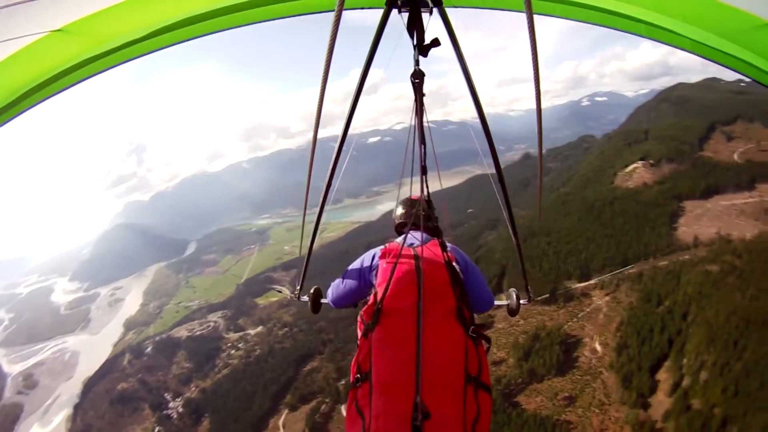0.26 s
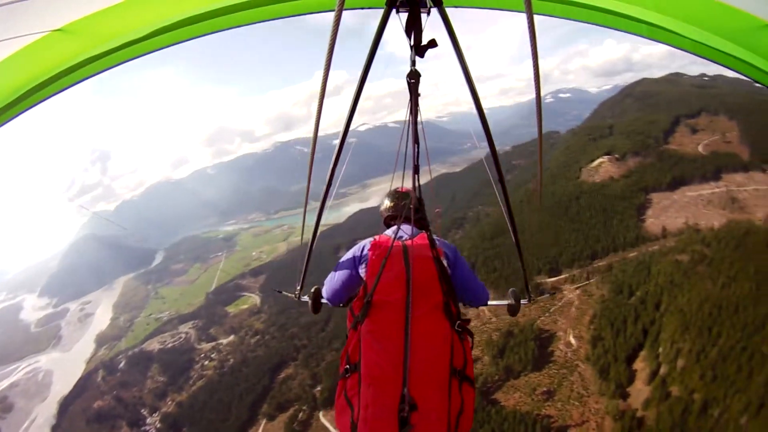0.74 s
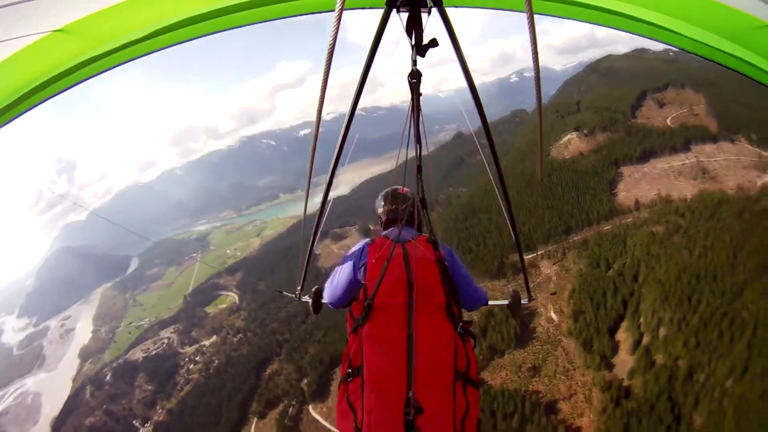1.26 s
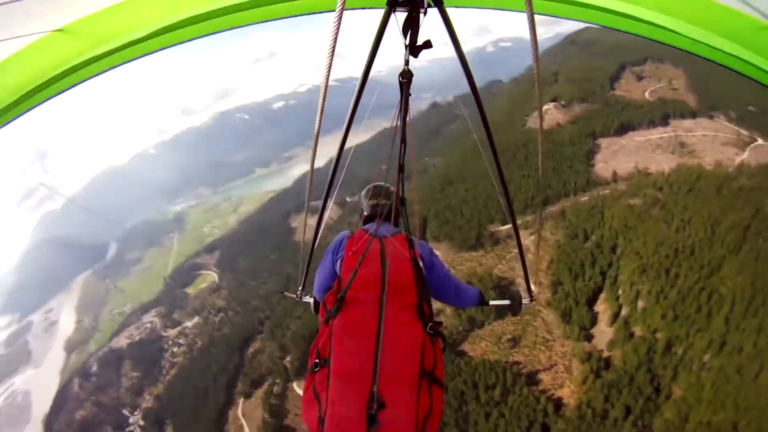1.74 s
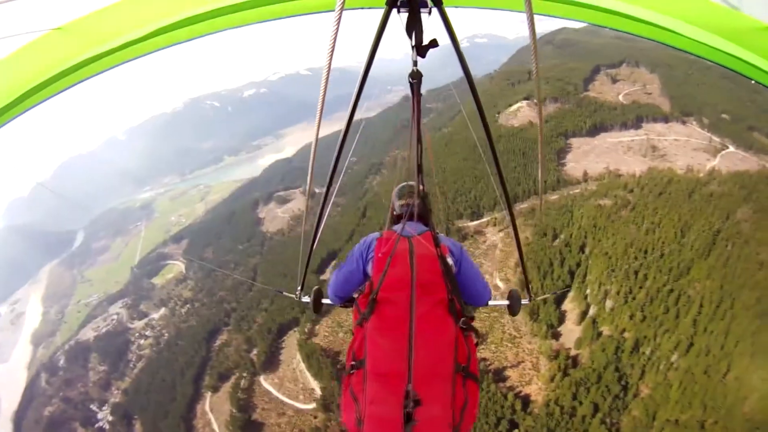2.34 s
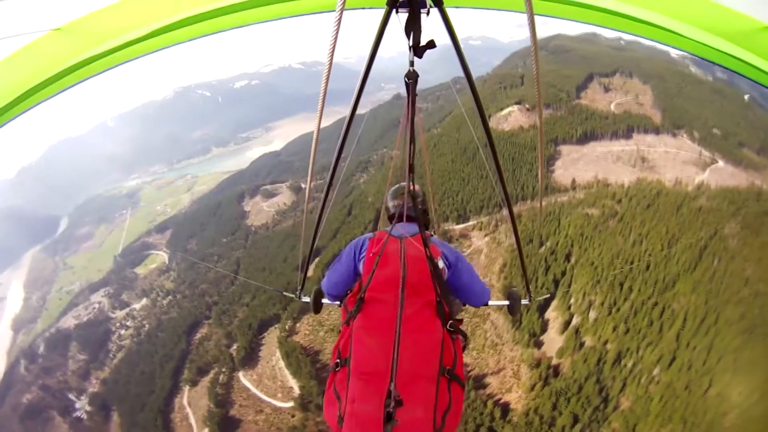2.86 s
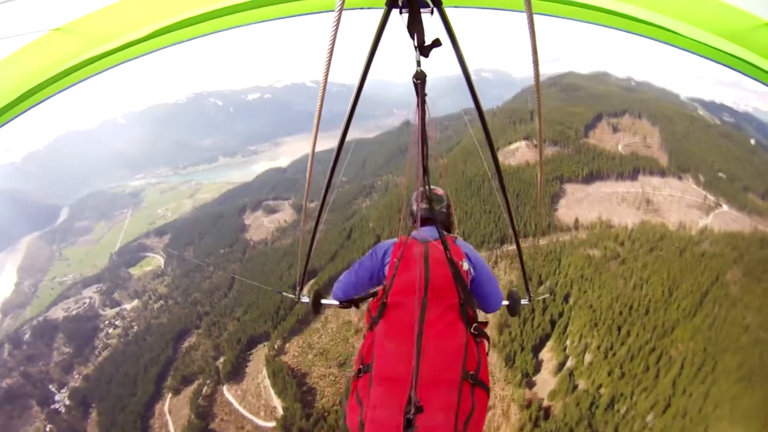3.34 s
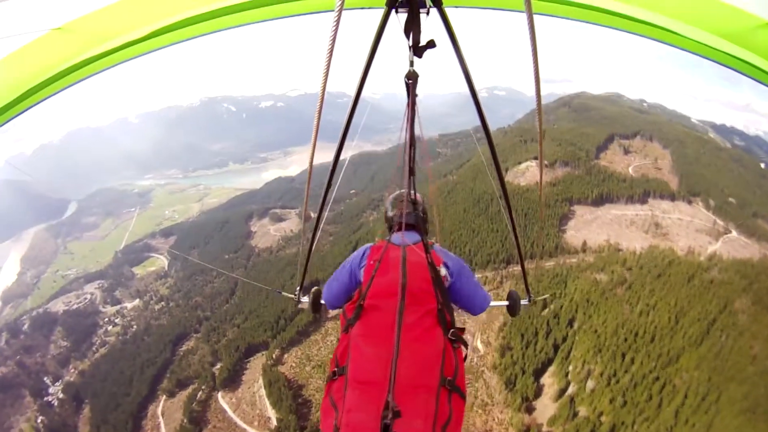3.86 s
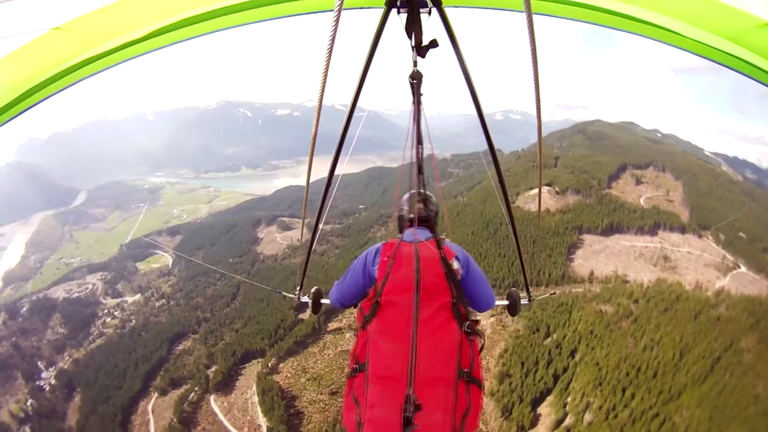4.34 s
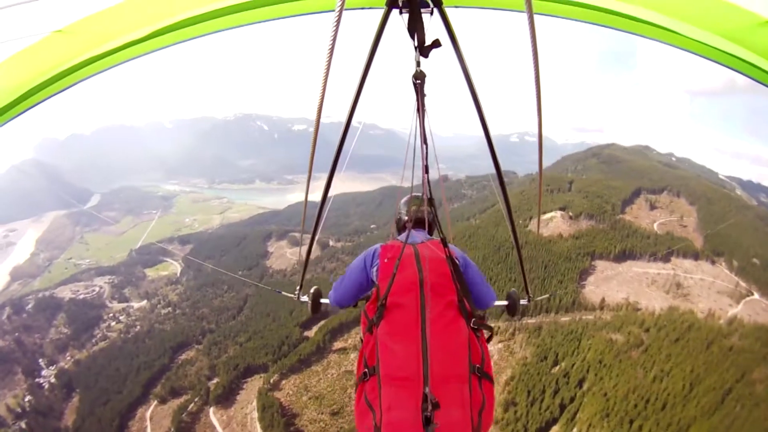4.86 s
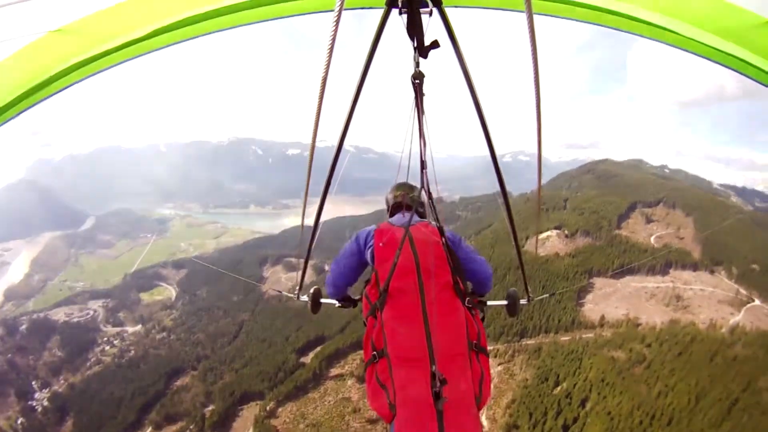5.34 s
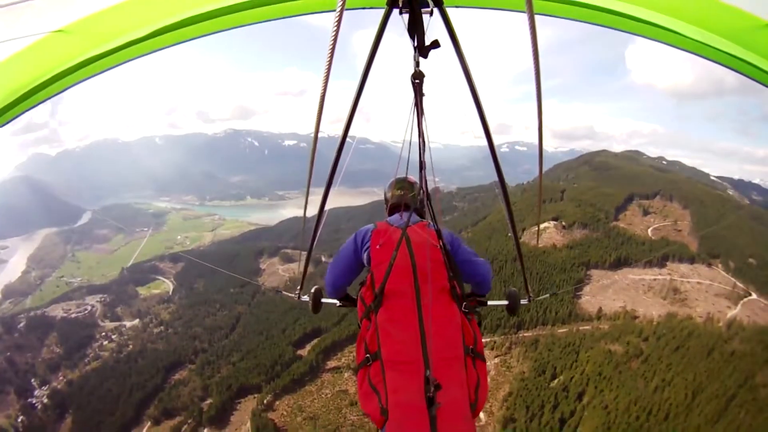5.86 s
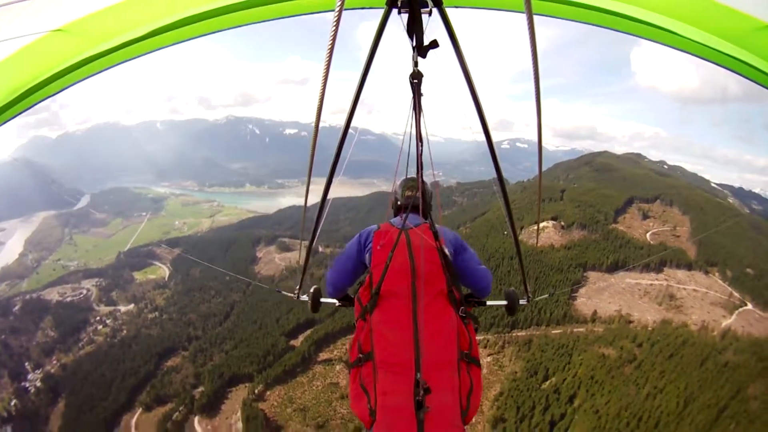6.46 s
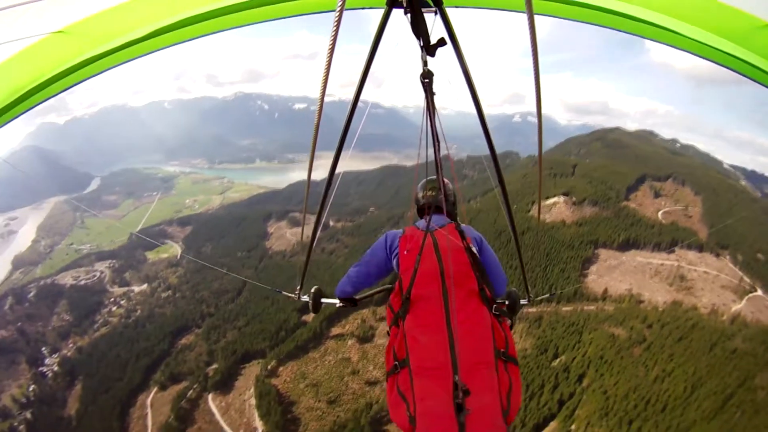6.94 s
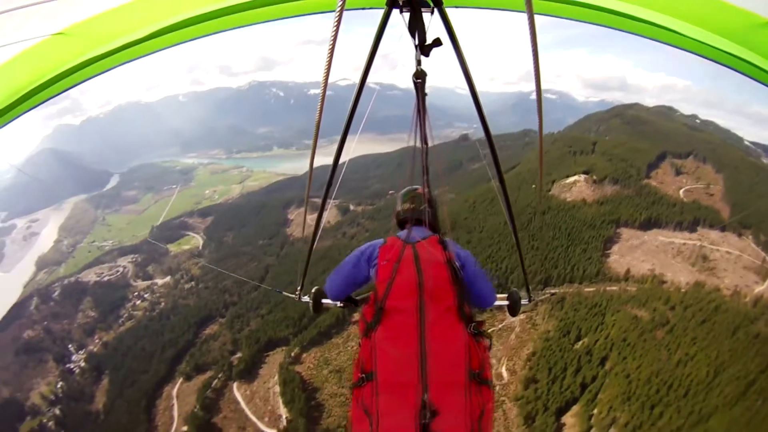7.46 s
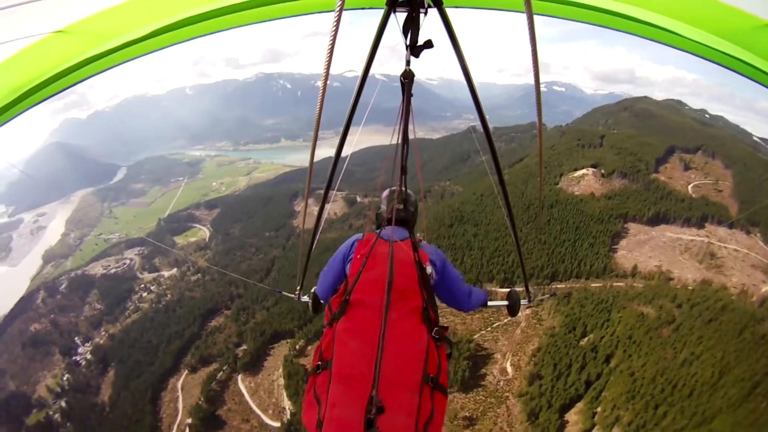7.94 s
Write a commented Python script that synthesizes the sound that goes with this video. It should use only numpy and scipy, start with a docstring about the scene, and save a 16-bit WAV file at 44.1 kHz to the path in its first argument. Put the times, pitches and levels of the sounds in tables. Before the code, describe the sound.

A hang glider in flight, heard through a small closed housing fixed to its frame, very close and without any echo. A brief stronger gust opens the sound, then deep, bass-heavy rumble continues with uneven surges and a low frame thrum. Over it, air sputters across the microphone port in hollow, breathy puffs lasting milliseconds, while a smoother soft rush passes over the sail. From 0.3 to 2 seconds the flow is moderate, with a dull jolt near 1.7. Faint dry ticks of a loose fitting gather around 2.6 to 3.1. The wind strengthens after 3 seconds, spitting hard and brightly at about 4.1 to 4.4, with more bursts and a clearer tick until 4.8. After 5 seconds it eases; soft thumps come near 5.8, 6.1, 6.2, 6.8 and 7.1. The last second is quieter, mostly rumble and gentle airflow, with a small knock near 8.1.

```python
"""Wind buffets the closed housing of a small camera on the keel of a hang glider: rumble and a frame mode,
made of low noise in three ranges. Small eddies spit across the microphone port and ring its cavity in short
puffs, made of noise with fast changes of level. A loose fitting ticks now and then, made of ringing sines.
Air rushes more smoothly over the sail, made of gently wavering noise, and the preamplifier hisses faintly."""
import sys
import numpy as np
from scipy import signal
from scipy.fft import rfft, irfft, next_fast_len
from scipy.io import wavfile
from scipy.ndimage import uniform_filter1d

SR = 44100
rng = np.random.default_rng(int(sys.argv[2]) if len(sys.argv) > 2 else 0)


def to_wav(sig):
    """Store sig (one row per channel, or 1-D mono) as 16-bit WAV at the path in sys.argv[1].

    Samples outside -1..1 are clipped; the rate is SR.
    """
    pcm = np.clip(np.atleast_2d(sig), -1, 1) * 32767
    pcm = np.round(pcm).astype(np.int16)
    wavfile.write(sys.argv[1], SR, pcm.T)  # frames by channels


def ratio(d):
    """dB to gain"""
    e = np.asarray(d, float) / 20
    return 10 ** e


N = 361619   # length of the scene in samples

# flow of air across the port, heard as the cavity rush: (time [s], level [dB])
PORT_FLOW = [(0.0, -45.5), (0.02, -35.5), (0.04, -45), (0.09, -41.5), (0.27, -49), (0.3, -42),
             (0.39, -43.5), (0.43, -50), (0.8, -47.5), (0.96, -51), (1.0, -48), (1.23, -41), (1.34, -48),
             (1.41, -42), (1.69, -48.5), (2.17, -41.5), (2.31, -40.5), (2.4, -40.5), (2.53, -44),
             (3.15, -40.5), (3.31, -33.5), (3.33, -38), (3.52, -35), (3.56, -39.5), (3.95, -39),
             (3.97, -47.5), (4.13, -31.5), (4.22, -34), (4.25, -33.5), (4.27, -32.5), (4.39, -33),
             (4.43, -33), (4.52, -44.5), (4.59, -38.5), (4.68, -37), (4.73, -45), (4.77, -45), (4.8, -41),
             (4.93, -47.5), (4.96, -55), (5.02, -46.5), (5.14, -52.5), (5.37, -49), (5.98, -49.5),
             (6.03, -53.5), (6.05, -41.5), (6.07, -49), (6.65, -52), (6.74, -46), (6.76, -52.5),
             (6.94, -50.5), (6.96, -47), (7.17, -55.5), (8.2, -57)]
PUFF_CREST_DB = 8.5   # peak of a burst of noise over its rms


def rms_one(x):
    """Scale to rms 1."""
    return x / np.sqrt(np.mean(x ** 2) + 1e-20)


def in_time(rows):
    """Draw straight lines between the rows of a table, giving each column at every sample."""
    s, *columns = np.transpose(rows)
    return [np.interp(np.arange(N) / SR, s, column) for column in columns]


def bells(rows):
    """Add up level changes (dB) that each swell and fade as a bell; the length is its standard deviation."""
    t = np.arange(N) / SR
    total_db = 0
    for s, change_db, length_ms in rows:
        total_db = total_db + change_db * np.exp(-.5 * ((t - s) / (length_ms / 1000)) ** 2)
    return total_db


def coloured(x, colour, low_hz=0, high_hz=np.inf):
    """Impose a spectrum, keeping one part of it between soft edges."""
    size = next_fast_len(N + 8192)
    hz = np.fft.rfftfreq(size, 1 / SR) + 1e-3   # never zero, for the logarithm
    colour_hz, colour_db = np.transpose(colour)
    gain = ratio(np.interp(np.log(hz), np.log(colour_hz), colour_db))
    gain *= np.sqrt(1 / (1 + (low_hz / hz) ** 8) / (1 + (hz / high_hz) ** 8))
    return irfft(rfft(x, size) * gain, size)[:N]


def drift(rate_hz):
    """Slow chance of spread 1: noise twice through a one-pole low-pass."""
    r = np.exp(-20 * np.pi * rate_hz / SR)   # worked out at every tenth sample
    noise = rng.standard_normal(N // 10 + 4002)
    slow = signal.lfilter([1], [1, -2 * r, r * r], noise)[4000:]   # skip the filter's start
    return np.interp(np.arange(N) / 10, np.arange(len(slow)), rms_one(slow))


def ring(clicks, hz, t60):
    """A unit click sets a sine of height 1 ringing, which falls by 60 dB in t60 seconds."""
    r = ratio(-60 / (max(t60, .002) * SR))
    w = 2 * np.pi * hz / SR
    return signal.lfilter([0, np.sin(w)], [1, -2 * r * np.cos(w), r * r], clicks + 1e-18)


def buffeting():
    """Low pressure noise: big eddies push evenly, the smallest in lumps; all surge a few times a second."""
    # buffeting before the jolts: (time [s], deep rumble [dB], frame thrum [dB], upper rumble [dB])
    buffet = [(0.0, -30, -56, -65), (0.04, -32, -46, -48), (0.11, -35.5, -45, -47.5),
              (1.05, -36.5, -44.5, -52), (1.48, -33, -46.5, -52), (1.53, -39.5, -46, -53),
              (1.71, -37.5, -44, -54.5), (2.47, -38, -39.5, -53.5), (2.69, -34, -42, -47.5),
              (3.08, -35, -36.5, -51), (3.31, -29, -47, -45.5), (3.38, -26.5, -33, -48),
              (3.45, -33.5, -47, -47), (3.54, -26.5, -47, -45), (3.59, -43, -34.5, -51),
              (3.9, -34, -44.5, -49.5), (4.22, -34.5, -37.5, -49.5), (4.27, -29, -30.5, -47),
              (4.41, -33, -44, -47), (4.54, -31, -39.5, -42), (4.91, -34, -42, -46),
              (5.71, -36, -37.5, -47), (5.98, -37, -45.5, -55), (6.05, -52, -41, -49),
              (6.12, -39, -45, -53.5), (7.42, -36.5, -43, -49.5), (8.06, -40, -43.5, -52.5),
              (8.2, -41, -44, -51.5)]
    # jolts of the frame, in full on the upper rumble: (time [s], level change [dB], length [ms])
    jolts = [(1.7, 13, 51), (2.05, 5.5, 35), (2.7, 5.5, 78), (3.45, -1, 53), (4.09, 11, 13), (4.69, 6, 21),
             (5.09, 2, 34), (5.4, 0, 37), (5.77, 6.5, 23), (6.07, 14, 23), (6.21, 15, 15), (6.83, 11, 15),
             (7.12, 10, 25), (8.1, 8.5, 49)]
    # colour of the rumble: (frequency [Hz], level per Hz [dB])
    rumble_colour = [(4, -5.5), (8, -10), (15, 1.5), (30, 0.5), (40, -1.5), (50, -8), (68, -8), (81, -2.5),
                     (100, -15), (140, -17.5), (250, -27), (400, -29.5), (700, -43.5)]
    # (low edge [Hz], high edge [Hz], evenness 0-1, lumpiness [dB], surge [dB])
    ranges = [(0, 53.7, 1.0, .1, 2.4), (58, 103.0, 0.89, .1, 2.2), (113, 490, .1, 1.4, 1.9)]
    thrum_jolt_share = 0.36
    deep_db, thrum_db, upper_db = in_time(buffet)
    jolt_db = bells(jolts)
    levels_db = [deep_db, thrum_db + thrum_jolt_share * jolt_db, upper_db + jolt_db]
    out = np.zeros(N)
    for level_db, (low_hz, high_hz, evenness, lumpy_db, surge_db) in zip(levels_db, ranges):
        noise = rng.standard_normal(N) * ratio(lumpy_db * drift(18))
        push = rms_one(coloured(noise, rumble_colour, low_hz, high_hz))
        # dividing by the noise's own smoothed power evens out its swells
        swell = uniform_filter1d(uniform_filter1d(push ** 2, size=1800), size=1800)
        even = push / (swell + 0.054) ** (evenness / 2)
        out += ratio(level_db) * rms_one(even * ratio(surge_db * drift(7.5)))
    return out


def spitting():
    """Eddies shed unevenly some tens of times a second (dB); a strong flow runs smoother than a weak one."""
    reference_flow_db = -43.5
    flow_db, = in_time(PORT_FLOW)
    shedding = rms_one(drift(160) + 0.81 * drift(60))
    lulls_db = 0.89 * drift(9.7)
    # take out most of the slow part
    shedding = rms_one(shedding - 0.81 * uniform_filter1d(shedding, size=1600))
    swing_db = np.clip(3.5 - 0.14 * (flow_db - reference_flow_db), 1, 9)
    return shedding * swing_db + 1.34 * drift(370) + lulls_db


def lesser_eddies():
    """Smaller bursts at random moments, their strength following the flow; rows as in the table of puffs."""
    gap, size, bright, length = rng.standard_normal((200, 4)).T
    s = np.cumsum(np.exp(.8 * gap) / 9.0)   # median gap 1/9 s
    flow_db = np.interp(s, *np.transpose(PORT_FLOW))
    rms_db = flow_db + 4.0 + 3 * np.tanh(size)   # at most 3 dB to either side
    bright_db = 6 * np.tanh(bright)
    length_ms = 2.35 * np.exp(0.58 * length)   # median 2.35 ms
    rows = np.transpose([s, rms_db + PUFF_CREST_DB, bright_db, length_ms])
    return list(rows[s < N / SR])


def puff_envelopes():
    """Each burst swells and dies within milliseconds: one envelope below the cavity top, one above."""
    # the strongest eddies bursting at the port:
    # (time [s], approximate peak [dB], level above the cavity top against below [dB], time to the peak [ms])
    puffs = [(0.0291, -21.5, -2, 2.7), (0.0647, -26.5, -6, 2.1), (0.7395, -28, 2, 4.4),
             (0.803, -22.5, -2, 3.5), (1.0109, -24.5, -2, 3), (1.1572, -27.5, 2, 3.9),
             (1.6667, -31, -13, 3), (2.386, -20.5, -4.0, 2.3), (2.5656, -39, -2, 3.9),
             (2.6283, -23.5, 1, 4), (2.6713, -24.5, 1, 2.6), (2.9047, -28.5, -4.0, 3.3),
             (3.0465, -27.5, -4.0, 2.9), (3.113, -21.5, -4.0, 3), (3.2221, -16, -7, 3),
             (3.4446, -17, -4.0, 2.7), (3.4784, -26.5, -2, 2.7), (3.5212, -19, -6, 2.8),
             (3.629, -33, -7, 2.3), (3.6925, -22, 3, 3), (3.868, -27.5, -4.0, 2.5), (3.934, -20.5, -1, 3.3),
             (4.037, -23.5, -2, 3), (4.097, -23.5, 1, 4.5), (4.2004, -24, -4.0, 3), (4.2697, -13.5, 3, 1.8),
             (4.5376, -27, -4.0, 2.3), (4.5632, -22.5, 3, 3.3), (4.6284, -19.5, -6, 4.5),
             (4.662, -17, -5, 3.3), (4.7455, -23, -3, 2.2), (4.7666, -17, -2, 3.1), (4.8586, -26, -8, 3.6),
             (5.0202, -27, -4.0, 3), (5.0868, -33.5, -4.0, 3.3), (5.3006, -30.5, -9, 3.6),
             (5.351, -28.5, -10, 3.2), (5.4273, -31.5, -4.0, 3.5), (5.6301, -32, -2, 3.7),
             (5.7498, -27, -4.0, 2.9), (5.793, -23, -4.0, 2.7), (5.833, -28, -4.0, 3.3),
             (6.0525, -24.5, -1, 2.3), (6.6037, -29, -12, 2.1), (6.736, -27, -8, 2),
             (6.958, -32, -4.0, 4.6)]
    dull, bright = np.zeros((2, N))
    for s, peak_db, bright_db, length_ms in list(puffs) + lesser_eddies():
        start = int(s * SR)
        width = np.clip(length_ms, 1, 15) * SR / 1000
        at = np.arange(min(int(6 * width), N - start))
        shape = ratio(peak_db - PUFF_CREST_DB) * (at / width * np.exp(1 - at / width)) ** 2.14
        dull[start + at] += shape
        bright[start + at] += ratio(bright_db) * shape
    return dull, bright


def port(spit_db):
    """Turbulence spits through the cavity, its top flickering partly alone; bursts ring the cavity firmly."""
    # brief changes of the rush, mostly dips: (time [s], level change [dB], length [ms])
    dips = [(.045, -9, 16), (.2, -3, 6.1), (.48, -10, 16), (.93, -5, 9.2), (1.73, -2.5, 19),
            (2.28, -6.5, 24), (2.555, -15, 5.6), (4.26, -10, 9), (4.62, -13, 3.9), (4.84, -13, 6.6),
            (5.14, -3, 7), (5.41, 0, 9.6), (5.78, -6, 14), (6.18, 2, 10), (6.9, -14, 6.1), (6.94, -7, 6.5),
            (7.19, -4, 8.1), (7.28, -3, 7.8)]
    # top of the rush against its body: (time [s], level [dB])
    treble = [(0, 0), (.5, -5), (1, -0.5), (1.5, 0), (2, 1.5), (2.5, 5), (3, 3.5), (3.4, 6.5), (3.8, -1.5),
              (4.2, 5.5), (4.5, 8.5), (4.75, 0), (5.2, 2.5), (5.7, 3.5), (6.2, -10), (6.7, -14), (7.2, 0),
              (7.7, -1), (8.2, 5)]
    # colour of the port and its cavity: (frequency [Hz], level per Hz [dB])
    port_colour = [(150, -42.5), (400, -21), (800, -7), (1250, -4), (1500, -1), (1680, 2), (1900, -5),
                   (2700, -24), (3500, -27), (4500, -28.5), (5000, -36), (5900, -46.5), (7000, -56),
                   (9000, -60), (14000, -84.5)]
    cavity_top_hz = 2920
    rush_db = in_time(PORT_FLOW)[0] + bells(dips)
    treble_db, = in_time(treble)
    dull, bright = puff_envelopes()
    flicker_db = .6 * spit_db + 2.93 * drift(110)
    bright = np.hypot(bright, ratio(rush_db + treble_db + flicker_db))   # puffs and rush add in power
    noise, other = rng.standard_normal((2, N))
    scale = np.std(coloured(noise, port_colour))
    below = coloured(noise * ratio(rush_db + spit_db), port_colour, high_hz=cavity_top_hz)
    above = coloured(noise * bright, port_colour, low_hz=cavity_top_hz)
    ringing = rms_one(coloured(other, port_colour, low_hz=1010, high_hz=cavity_top_hz))
    # evening out the ringing noise makes each burst firm
    swell = uniform_filter1d(uniform_filter1d(ringing ** 2, size=60), size=60)
    firm = rms_one(ringing / (swell + 0.034) ** 0.82)
    return (below + above) / scale + dull * firm


def fitting():
    """Each tick strikes the modes near its own pitch hardest; the housing softens and dulls it."""
    # ticks of a loose fitting: (time [s], strength [dB], share of the high ring [dB], pitch struck [Hz])
    ticks = [(1.1326, -38.5, -24, 3700), (1.8971, -44, -38, 4000), (1.9245, -52, -38, 4200),
             (1.99, -43, -8, 4300), (2.37, -45, -14, 4200), (2.627, -36, -17, 4000),
             (2.763, -32, -26, 3370), (2.844, -34, -41, 4300), (3.1146, -35.5, -26, 3660),
             (3.9361, -37, -30, 3700), (4.539, -28.5, -26, 3850), (4.603, -34, -30, 4500),
             (4.6754, -44, -10, 4200), (4.931, -43, -31, 3600), (5.0877, -38, -36, 2840),
             (5.6307, -47, -29, 3600), (5.8327, -45, -36, 3600), (6.0503, -39, -12, 4100),
             (6.2, -42, -19, 4000), (6.8206, -45.5, -20, 3200), (6.957, -57, -16, 4000),
             (8.066, -45.5, -20, 3400)]
    # what a tick rings: (frequency [Hz], level [dB], time to fall by 60 dB [s])
    modes = [(2820, -1, 0.011), (3200, -3.5, 0.0096), (3700, -1, 0.0082), (4200, -6, 0.01),
             (4900, -4, 0.0038)]
    # its thin high ring, one row: (frequency [Hz], level [dB], time to fall by 60 dB [s])
    high_ring = (5820, 5.1, 0.0091)
    soften_s = .004
    s, peak_db, ring_db, struck_hz = np.transpose(ticks)
    at = np.round(s * SR).astype(int)
    signs = rng.choice([-1, 1], (len(ticks), len(modes) + 1))
    # a mode loses 16 dB for each octave from the pitch struck
    levels_db = [peak_db + db - 16 * abs(np.log2(hz / struck_hz)) for hz, db, t60 in modes]
    levels_db.append(peak_db + ring_db + high_ring[1])
    out = np.zeros(N)
    for k, (hz, db, t60) in enumerate(list(modes) + [high_ring]):
        clicks = np.zeros(N)
        clicks[at] = ratio(levels_db[k]) * signs[:, k]
        once = ring(clicks, hz, t60)
        # a second short ring at the same pitch softens the onset
        out += ring(once, hz, soften_s) * 2 * np.log(1000) / (soften_s * SR)
    return signal.sosfilt(signal.butter(4, 6800, fs=SR, output="sos"), out)


def sail(spit_db):
    """Air rushes more smoothly over the sail; the eddies at the port shake it a little too."""
    # air over the sail: (time [s], level [dB])
    sail_flow = [(0.0, -46), (0.55, -48.5), (1.19, -47.5), (1.92, -48.5), (3.52, -44), (4.39, -43.5),
                 (5.0, -45), (7.65, -51), (8.2, -50)]
    # colour of the sail's rush: (frequency [Hz], level per Hz [dB])
    sail_colour = [(120, 3.5), (250, -3.5), (420, -0.5), (620, 1.5), (1000, -5.5), (1600, -19.5),
                   (2400, -30.5), (3500, -25), (4600, -24), (5500, -34.5), (7000, -47), (9000, -66.5)]
    noise = rng.standard_normal(N) * ratio(3.1 * drift(50) + .35 * spit_db)
    return ratio(in_time(sail_flow)[0]) * rms_one(coloured(noise, sail_colour))


def scene():
    """All sources reach one microphone."""
    spit_db = spitting()
    mix = buffeting() + port(spit_db) + sail(spit_db) + fitting()
    return mix[None]   # one channel


def low_pass(x):
    """Removes everything above the highest recorded frequency."""
    return signal.sosfilt(signal.butter(12, 14170, fs=SR, output="sos"), x)


def record(dry):
    """The preamplifier adds a faint hiss of white noise."""
    hiss_db = -79.5
    hiss = ratio(hiss_db) * rng.standard_normal(dry.shape)
    return low_pass(dry + hiss)


dry = scene()
out = record(dry)
to_wav(out)
```